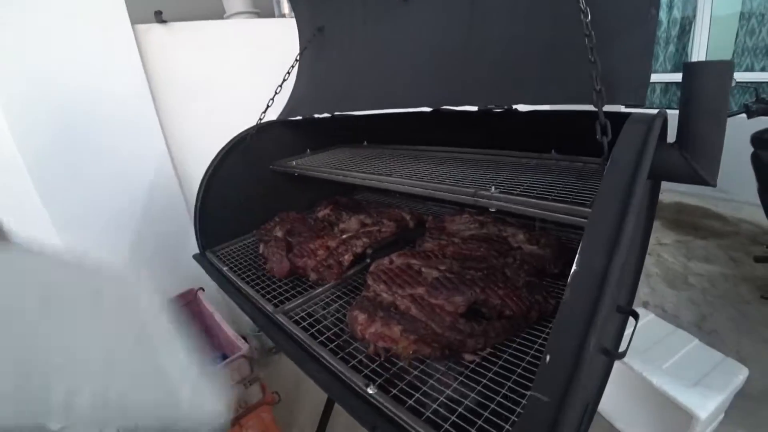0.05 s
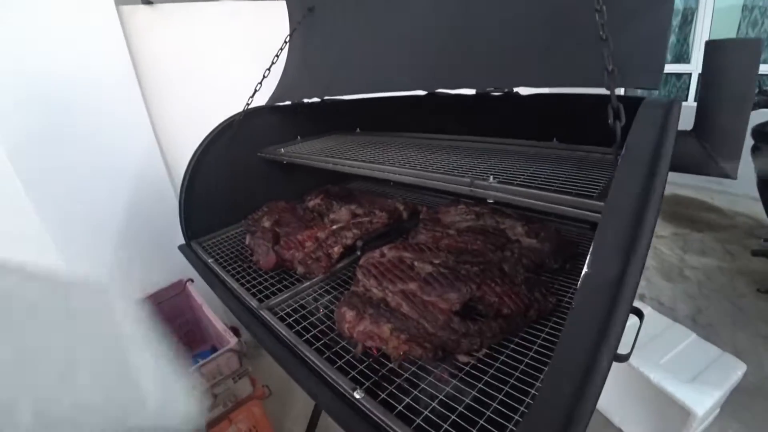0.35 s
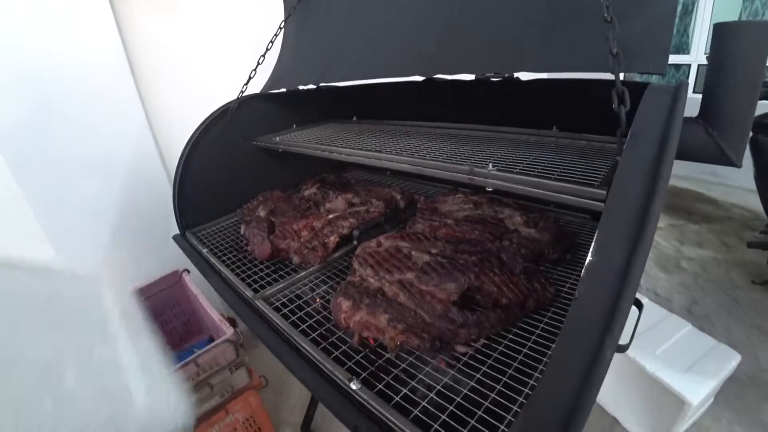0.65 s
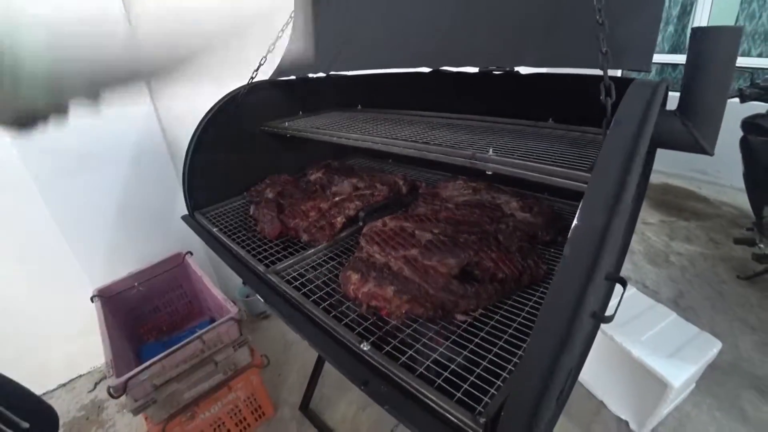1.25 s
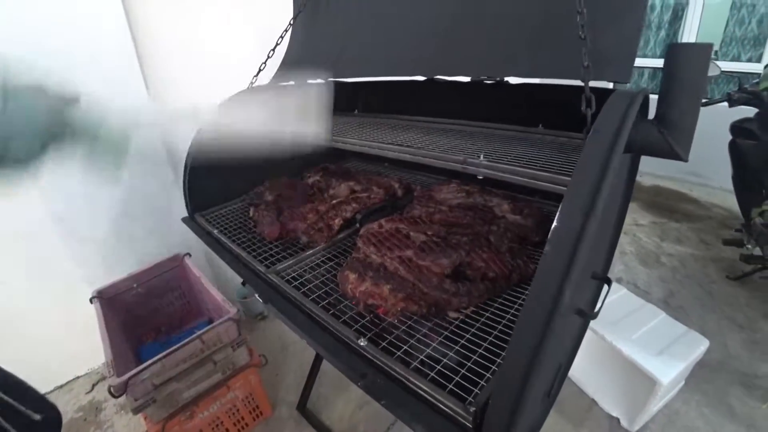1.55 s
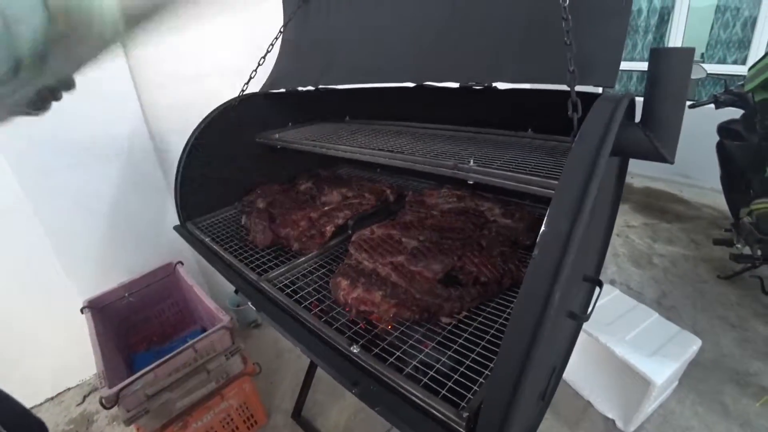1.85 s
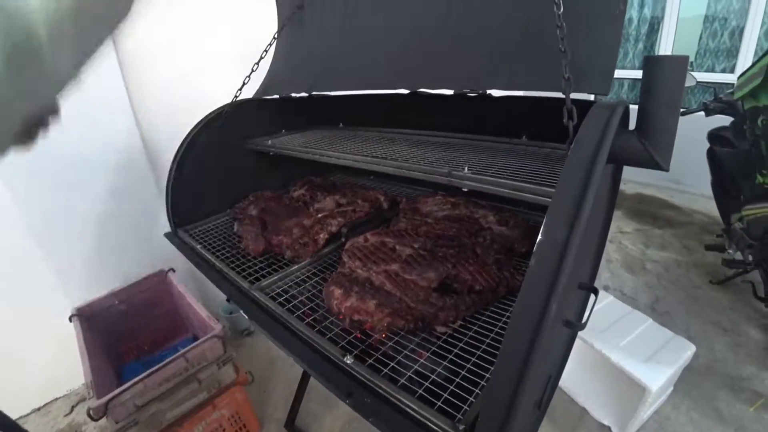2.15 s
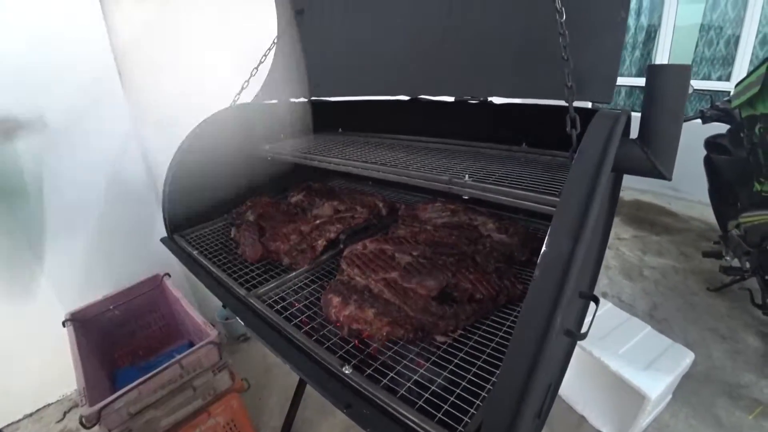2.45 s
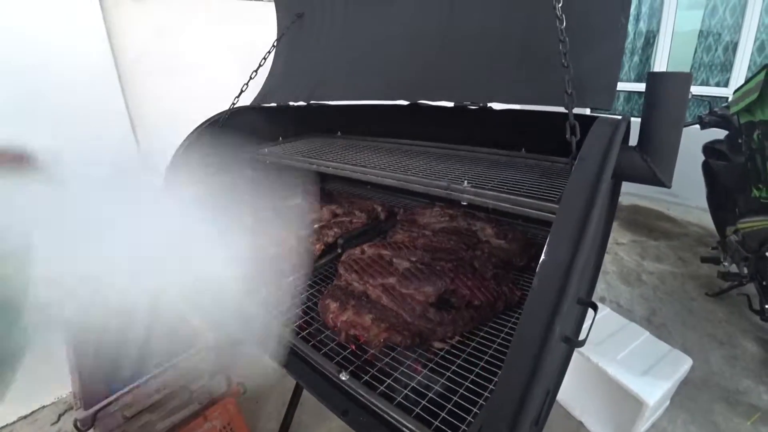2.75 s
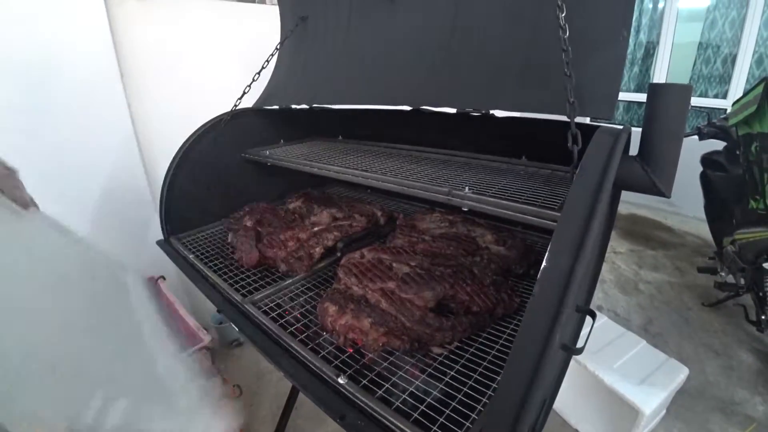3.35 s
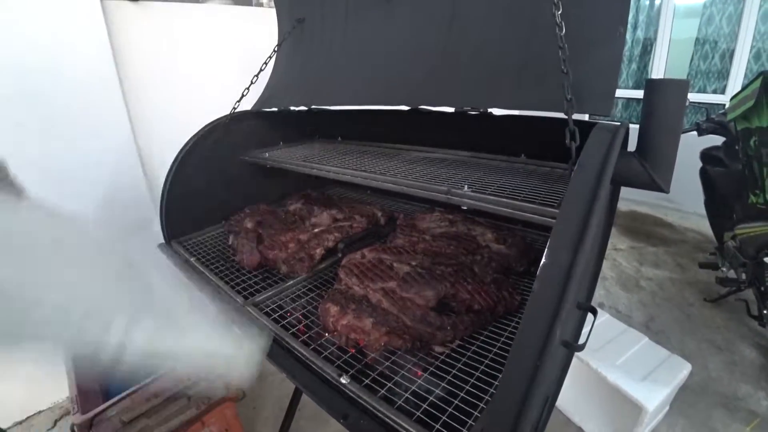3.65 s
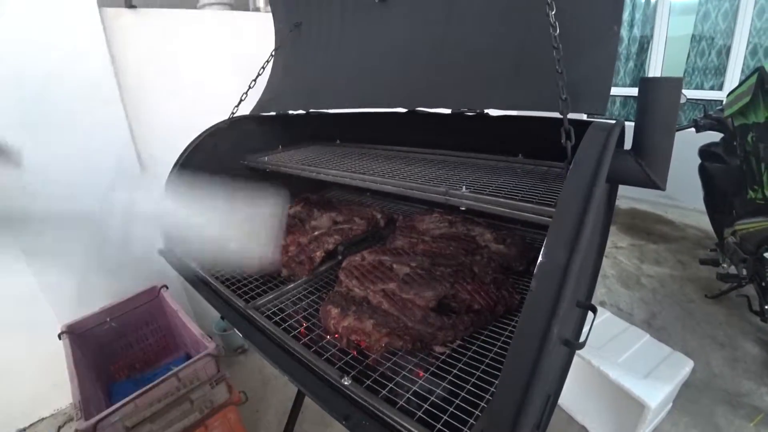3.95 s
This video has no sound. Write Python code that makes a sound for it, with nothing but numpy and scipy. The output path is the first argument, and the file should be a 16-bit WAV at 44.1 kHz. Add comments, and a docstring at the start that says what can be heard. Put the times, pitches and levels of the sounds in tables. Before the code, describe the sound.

A plastic lid whooshes as it fans a charcoal grill outdoors. It snaps once, makes two strokes and a slow hissing sweep, then settles into quick, even strokes whose gusts overload the close microphone over faint low rumble.

```python
"""A plastic lid fans a charcoal grill close to the microphone, over low rumble and a distant hum.
The lid snaps as it flexes and makes two strokes, then one slow hissing sweep with a knock near 1 s.
From 1.4 s ten more strokes follow, nearly four a second; the lid's edge buzzes briefly at 1.9 s.
Each stroke sends a low gust and a rush of air that sharpens into a hiss; then its pressure wave
overloads the microphone, which chokes twice: on the push and on the suction behind it."""
import sys
import numpy as np
from scipy import signal
from scipy.fft import rfft, irfft
from scipy.io import wavfile
from scipy.ndimage import uniform_filter1d

SR = 44100
rng = np.random.default_rng(int(sys.argv[2]) if len(sys.argv) > 2 else 0)


def generate_wav(signal):
    """Clip the signal to [-1, 1] and save it as 16-bit WAV at the path in sys.argv[1]."""
    frames = np.transpose(np.atleast_2d(signal))
    scaled = np.clip(frames, -1, 1) * 32767
    pcm = np.round(scaled).astype(np.int16)
    wavfile.write(sys.argv[1], SR, pcm)


N = 176400
TIME = np.arange(N) / SR
FREQ = np.fft.rfftfreq(N, 1 / SR)
MIC_LIMIT = 1.14
LID_IN_HISS, HISS_SIDE_DB = 0.18, -16

# lid strokes: pass_s, push_s, swing_s, suction_s, hiss_db, hiss_lead_s, rush_db, gust_db
LID_STROKES = [(0.248, 0.024, .020, 0.0165, -28, 0.084, -43, -36),
               (.515, .043, .022, .023, -26, .13, -29.5, -17),
               (1.364, 0.027, .024, 0.014, -18.5, 0.11, -53, -30.5),
               (1.644, 0.033, 0.026, 0.016, -21, .16, -30, -23),
               (1.913, 0.022, 0.029, 0.014, -21, 0.16, -26.5, -23),
               (2.174, 0.029, 0.019, 0.024, -22.5, 0.14, -30.5, -20),
               (2.451, 0.031, 0.023, 0.016, -24.5, 0.12, -36, -24),
               (2.731, 0.029, 0.026, 0.012, -25, 0.12, -37, -30),
               (3.002, 0.0248, 0.0215, 0.0244, -25.5, 0.096, -38.5, -32.5),
               (3.273, 0.032, 0.02, 0.018, -25, 0.11, -35.5, -37),
               (3.546, 0.032, 0.018, 0.02, -28, 0.1, -41, -35),
               (3.815, 0.03, .020, 0.015, -27.5, 0.091, -43, -52)]
# spectra of rushing air, low gusts and the lid's knock: freq_hz, level_db
RUSH_SPECTRUM = [(30, 9), (150, -6.5), (300, -3), (600, -11.5), (850, -4.5), (1200, -10.5), (2500, -25.5),
                 (5000, -25), (11000, -32)]
GUST_SPECTRUM = [(15, 2), (40, -6), (75, -2), (120, 4.5), (170, -7.5), (300, -15.5), (800, -34),
                 (11000, -78)]
KNOCK_SPECTRUM = [(100, -12), (300, -5), (500, -1), (800, -1.5), (1100, -10), (1600, -19), (3000, -12.5),
                  (11000, -39)]


def amp(db):
    """Decibels to gain."""
    return 10 ** (np.asarray(db) / 20)


def unit(x):
    """Scale to rms 1."""
    return x / np.sqrt(np.mean(x ** 2) + 1e-20)


def bell(peak_s, width_s):
    """Gaussian swell, peak 1."""
    return np.exp(-((TIME - peak_s) / width_s) ** 2)


def wander(hz):
    """Random motion below hz, rms 1."""
    return unit(irfft(rfft(rng.standard_normal(N)) / (1 + (FREQ / hz) ** 4), N))


def noise(spectrum, extra_db=0, side_db=-19):
    """Shaped, nearly mono stereo noise, rms 1."""
    freq_hz, level_db = np.transpose(spectrum)
    gain = amp(np.interp(np.log(FREQ + 1), np.log(freq_hz), level_db) + extra_db) * (FREQ > 12)
    mid, side = irfft(rfft(rng.standard_normal((2, N))) * gain, N)
    return unit(mid + amp(side_db) * np.array([side, -side]))


def lid_colour_db():
    """Boost over frequency from the lid's resonances."""
    # resonances: freq_hz, width_hz, boost_db
    modes = [(2620, 90, 11), (3350, 110, 8), (3850, 130, 9), (5070, 200, 10), (5850, 300, 6),
             (8500, 400, 3)]
    return sum(db / (1 + (2 * (FREQ - hz) / width_hz) ** 2) for hz, width_hz, db in modes)


def outdoors():
    """Low rumble and a distant machine's wavering hum."""
    # rumble: freq_hz, level_db
    rumble_spectrum = [(15, 1.5), (35, 7.5), (70, -14.5), (125, -3), (200, -16), (330, -20), (550, -23.5),
                       (900, -28), (1400, -29.5), (2800, -34.5), (6000, -37), (11000, -41)]
    # hum: pitch_hz, level_db
    partials = [(108, -34.5), (248, -49), (602, -55)]
    hum = sum(amp(db) * np.sqrt(2) * np.sin(2 * np.pi * hz * TIME + 1.24 * wander(hz=2.5))
              for hz, db in partials)
    return amp(-28.5) * noise(rumble_spectrum) + hum


def lid():
    """The lid snaps once as it flexes; later its edge buzzes."""
    # snap: freq_hz, level_db
    snap_spectrum = [(100, -2), (900, 4.5), (2000, -3), (4500, 4.5), (7000, 0), (11000, -2.5)]
    # edge buzz: pitch_hz, level_db
    partials = [(385, -22), (497, -15), (758, -16.5), (1550, -33)]
    snap_s, hold_s, decay_s, tail_s = .2172, 0.0026, 0.0019, 0.0056
    t = TIME - snap_s
    crack = np.exp(-np.maximum(t - hold_s, 0) / decay_s) * (t > 0)
    tail = amp(-3.5) * np.exp(-abs(t - hold_s) / tail_s) * (t > -hold_s)
    snap = amp(-8) * np.hypot(crack, tail) * noise(snap_spectrum, lid_colour_db())
    buzz = sum(amp(db) * np.sqrt(2) * np.sin(2 * np.pi * (hz * TIME + rng.random()))
               for hz, db in partials)
    return snap + bell(peak_s=1.902, width_s=0.0069) * (buzz + amp(-18) * noise(KNOCK_SPECTRUM))


def edge_air():
    """Air around the lid's edge: hollow puffs going back, crisp swishes going forward."""
    # back swings: peak_s, level_db, resonance_hz
    hollows = [(.43, -33, 814), (0.841, -28, 616), (1.53, -34.5, 800), (2.08, -36, 700),
               (2.345, -34.5, 880), (2.635, -35, 860), (3.18, -34, 850), (3.715, -38, 855)]
    # close passes: peak_s, level_db, width_s
    swishes = [(.962, -19.5, 0.0056), (1.35, -24, .012), (2.155, -33, 0.011), (2.984, -31.5, 0.0084),
               (3.263, -21.5, 0.008), (3.779, -28, .006), (3.808, -29, 0.0082)]
    # swish: freq_hz, level_db
    swish_spectrum = [(100, -4.5), (700, 1), (2400, 1), (4500, -4), (7000, -13), (11000, -17)]
    puffs = 0
    for peak_s, db, hz in hollows:
        resonance_db = -20 * np.log10(1 + ((FREQ / hz - 1) / 0.36) ** 2)
        puffs += amp(db) * bell(peak_s, width_s=0.022) * noise(RUSH_SPECTRUM, resonance_db)
    swish_gain = sum(amp(db) * bell(peak_s, width_s) for peak_s, db, width_s in swishes)
    return puffs + swish_gain * noise(swish_spectrum, LID_IN_HISS * lid_colour_db(), HISS_SIDE_DB)


def buffets():
    """Eddies strike the microphone."""
    # broad bursts and low thumps: peak_s, level_db, width_s
    bursts = [(0.072, -25, 0.068), (.42, -20.5, 0.022), (.675, -23.5, 0.037), (0.966, -13.5, 0.023),
              (1.04, -25.5, 0.079), (1.781, -17.5, 0.019)]
    thumps = [(.075, -18.5, 0.029), (.49, -19, 0.017), (.67, -22.5, 0.024), (1.555, -22.5, 0.017),
              (1.778, -16.5, 0.01), (2.1, -28.5, 0.027), (2.82, -26.5, 0.02), (3.461, -22, 0.0136)]
    # turbulence: freq_hz, level_db
    burst_spectrum = [(30, 23), (110, 11.5), (200, 0.5), (600, -0.5), (1000, -5), (1600, -11), (3500, -15),
                      (6000, -14), (11000, -20.5)]
    burst_gain = sum(amp(db) * bell(peak_s, width_s) for peak_s, db, width_s in bursts)
    thump_gain = sum(amp(db) * bell(peak_s, width_s) for peak_s, db, width_s in thumps)
    return burst_gain * noise(burst_spectrum) + thump_gain * noise(GUST_SPECTRUM)


def sweep():
    """One long hiss of air over the coals; the flexing lid knocks midway."""
    # hiss envelope: time_s, level_db
    envelope = [(.6, -48), (.68, -38), (.71, -23), (.76, -25.5), (.85, -23), (.93, -21.5), (.965, -18.5),
                (1.0, -28.5), (1.03, -25.5), (1.08, -17), (1.13, -21.5), (1.2, -28), (1.26, -32.5),
                (1.34, -47)]
    # swept air: freq_hz, level_db
    air_spectrum = [(30, -20), (130, -8), (260, 0.5), (400, -4), (600, 3), (950, -0.5), (1800, 0),
                    (3000, -1.5), (5200, -1), (6500, -2), (11000, -5.5)]
    level_db = np.interp(TIME, *np.transpose(envelope), left=-99, right=-99) + 1.14 * wander(hz=60.6)
    air = amp(level_db) * noise(air_spectrum, LID_IN_HISS * lid_colour_db(), side_db=-31)
    knock = amp(-13) * bell(peak_s=.969, width_s=0.0075) * noise(KNOCK_SPECTRUM)
    return air + knock


def whooshes():
    """Air moved by each stroke: gust, rush, a hiss cresting just before the pass, then wake eddies."""
    # hiss: freq_hz, level_db
    hiss_spectrum = [(30, -12), (250, -5), (600, 1.5), (1000, -1), (1800, 1.5), (3000, 2.5), (5000, 2),
                     (6500, -2), (11000, -4.5)]
    rise_db_per_s, fall_db_per_s, crest_lead_s, onset_s = 123, 502, .012, 0.0066
    rush_lead_s, gust_lead_s = 0.072, 0.088
    wake_db, wake_width_s = -24.5, .014
    hiss_power = rush_gain = gust_gain = 0
    for pass_s, push_s, swing_s, suction_s, hiss_db, hiss_lead_s, rush_db, gust_db in LID_STROKES:
        t = TIME - pass_s + crest_lead_s
        onset = .5 + .5 * np.tanh((TIME - pass_s + hiss_lead_s) / onset_s)
        hiss_power += (onset * amp(hiss_db + np.minimum(rise_db_per_s * t, -fall_db_per_s * t))) ** 2
        rush_gain += amp(rush_db) * bell(pass_s - rush_lead_s, width_s=0.066)
        gust_gain += amp(gust_db) * bell(pass_s - gust_lead_s, width_s=0.033)
        release_s = pass_s + push_s + swing_s + suction_s
        gust_gain += amp(wake_db) * bell(release_s + wake_width_s, wake_width_s)
    hiss = np.sqrt(hiss_power) * noise(hiss_spectrum, LID_IN_HISS * lid_colour_db(), HISS_SIDE_DB)
    hiss *= amp(1.5 * wander(hz=60))
    rush = rush_gain * noise(RUSH_SPECTRUM) * amp(2.5 * wander(hz=35))
    return hiss + rush + gust_gain * noise(GUST_SPECTRUM)


def pressure():
    """Each stroke's slow wave: push, small tick, suction. Pressure 1 = microphone limit."""
    # air ahead of the lid: lead_s, pressure
    bow_wave = [(0.1, -0.07), (0.082, -0.32), (0.051, 0.36), (0.0243, -0.13), (.01, 0.14)]
    # stray puffs as the lid turns: peak_s, pressure, width_s
    puffs = [(0.017, 0.4, 0.0095), (.163, -1.73, 0.0165), (0.503, -1.04, 0.0043), (.981, 0.63, 0.008),
             (1.322, -0.66, 0.011), (1.885, -.5, 0.013), (2.677, 0.64, 0.0072), (3.215, 0.76, 0.013)]
    push_peak, suction_peak, edge_s, settle_s = 2.1, -1.6, 0.0064, 0.036
    tick_peak, tick_decay_s = .075, .0005
    wave = sum(height * bell(peak_s, width_s) for peak_s, height, width_s in puffs)
    ticks = 0
    for pass_s, push_s, swing_s, suction_s, *_ in LID_STROKES:
        turn_s, back_s = push_s + swing_s / 2, push_s + swing_s
        release_s = back_s + suction_s
        points = [(-0.0034, 0.0016)] + [(-lead_s, height) for lead_s, height in bow_wave]
        points += [(0, 1), (push_s / 2, push_peak), (push_s, 1), (turn_s, 0.15), (back_s, -1),
                   (back_s + edge_s, suction_peak), (release_s - edge_s, suction_peak),
                   (release_s, -1), (release_s + settle_s, 0.051), (.16, 0)]
        wave += np.interp(TIME - pass_s, *np.transpose(points))
        t = TIME - pass_s - turn_s
        ticks -= tick_peak * (t > 0) * np.exp(-abs(t) / tick_decay_s)
    return uniform_filter1d(wave, size=220) + uniform_filter1d(ticks, size=6)


def scene():
    """Air and lid at the microphone's two ports, which feel slightly different pressure."""
    port_gain = 1 + 0.038 * wander(hz=10.8) * np.array([[1], [-1]])
    return (whooshes() + sweep() + MIC_LIMIT * port_gain * pressure()
            + buffets() + edge_air() + lid() + outdoors())


def record(dry):
    """The microphone saturates, leaking a little mostly dull sound; then bass cuts, clip, low-pass."""
    leak, dull_leak, dull_band_hz = 0.048, .17, [250, 2080]
    bass_cuts_hz, ceiling, top_hz = (29.8, 15.2), .92, 11200
    held = np.clip(dry, -MIC_LIMIT, MIC_LIMIT)
    excess = dry - held
    dull = signal.sosfilt(signal.butter(2, dull_band_hz, "band", fs=SR, output="sos"), excess)
    mic = held + leak * excess + dull_leak * dull
    for hz in bass_cuts_hz:
        mic = signal.lfilter(*signal.butter(1, hz, "high", fs=SR), mic)
    lowpass = signal.firwin(301, top_hz, window=("kaiser", 7), fs=SR)
    return signal.oaconvolve(np.clip(mic, -ceiling, ceiling), lowpass[None], "same")


dry = scene()
out = record(dry)
generate_wav(out)
```